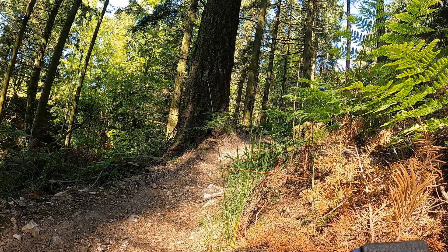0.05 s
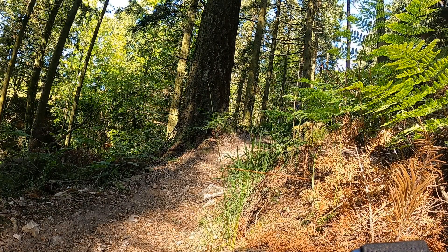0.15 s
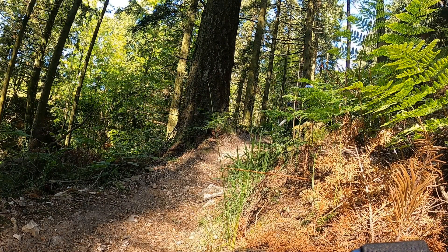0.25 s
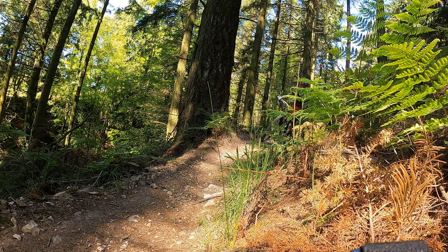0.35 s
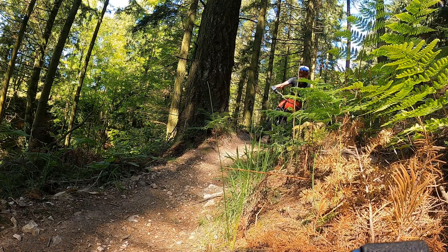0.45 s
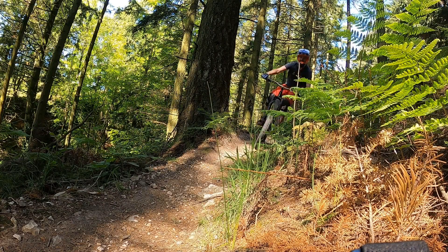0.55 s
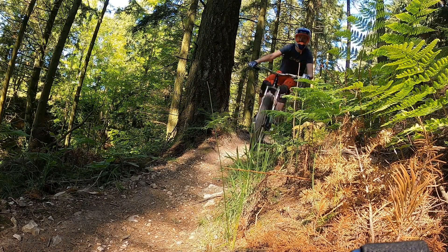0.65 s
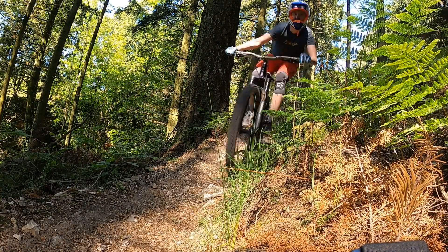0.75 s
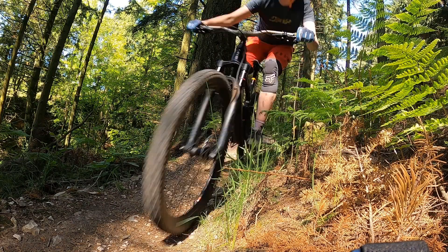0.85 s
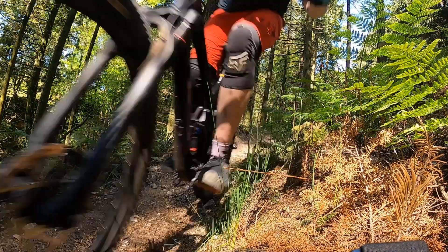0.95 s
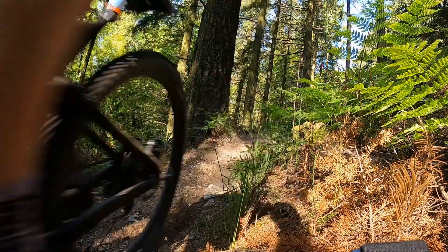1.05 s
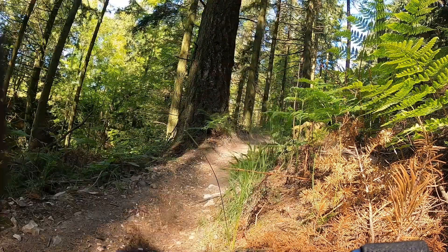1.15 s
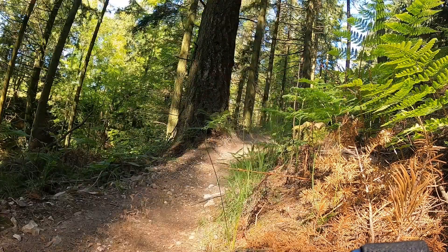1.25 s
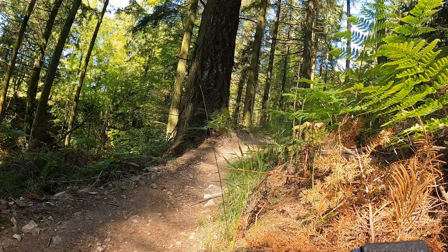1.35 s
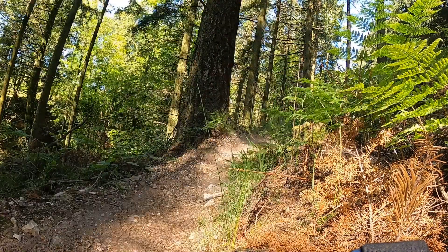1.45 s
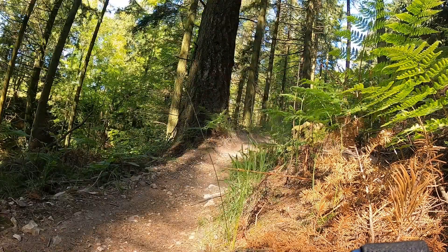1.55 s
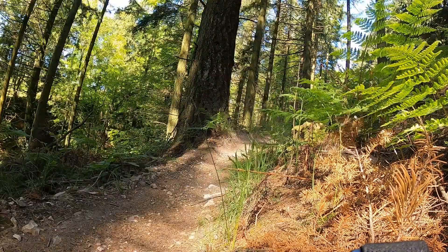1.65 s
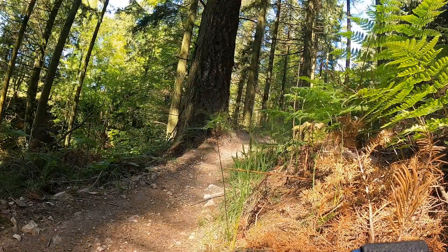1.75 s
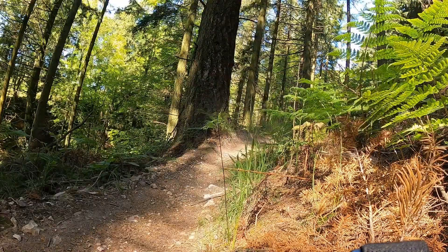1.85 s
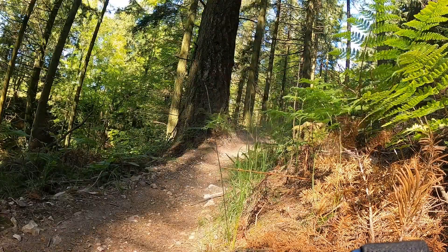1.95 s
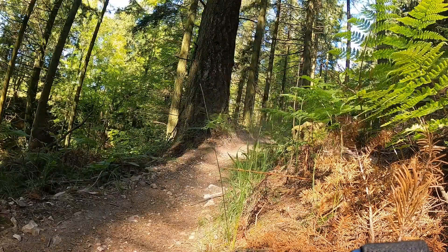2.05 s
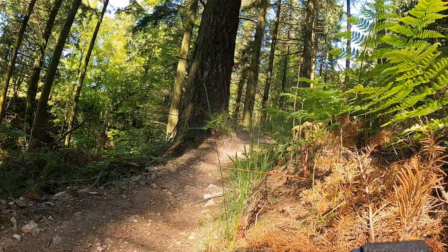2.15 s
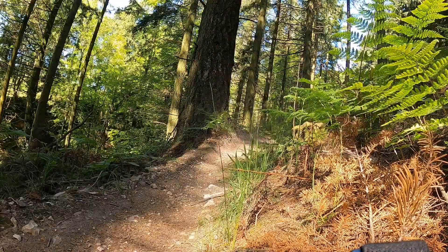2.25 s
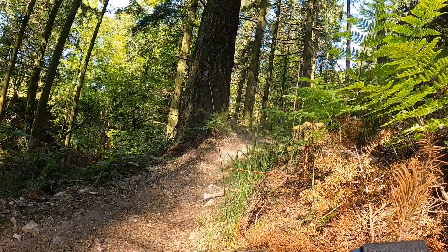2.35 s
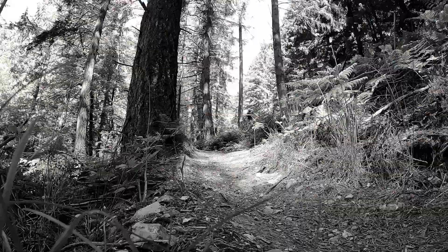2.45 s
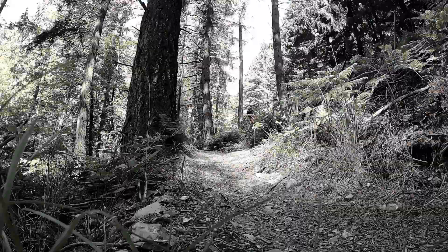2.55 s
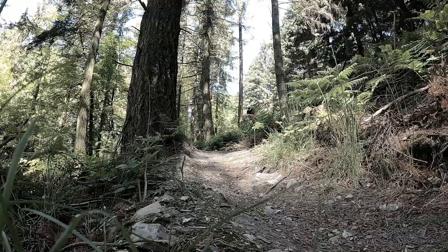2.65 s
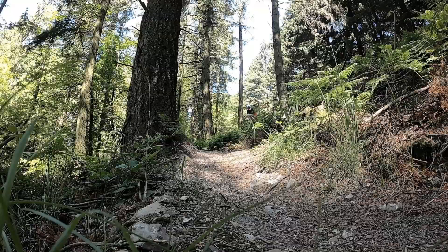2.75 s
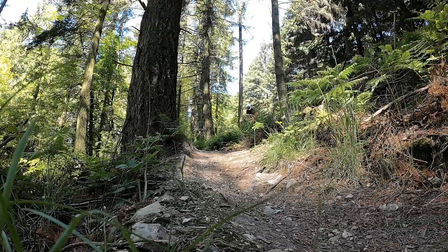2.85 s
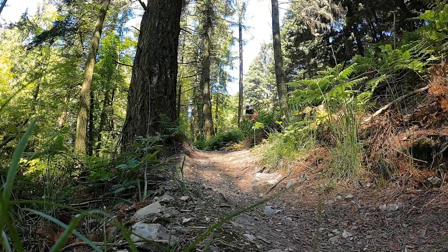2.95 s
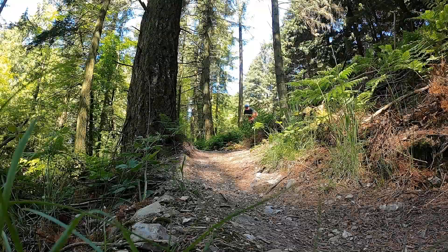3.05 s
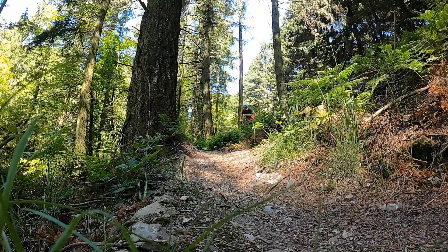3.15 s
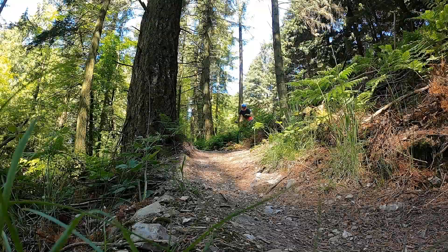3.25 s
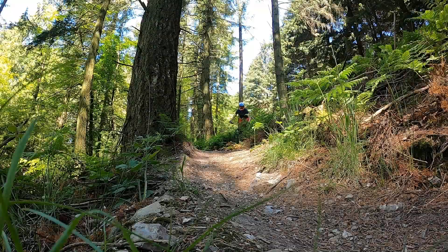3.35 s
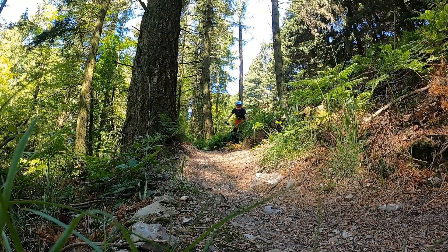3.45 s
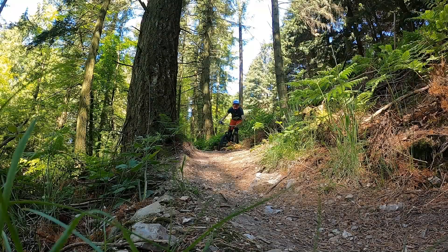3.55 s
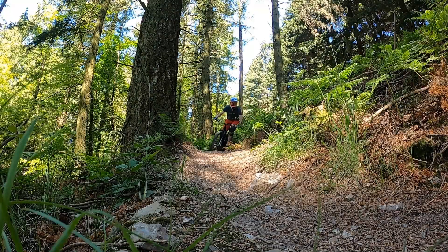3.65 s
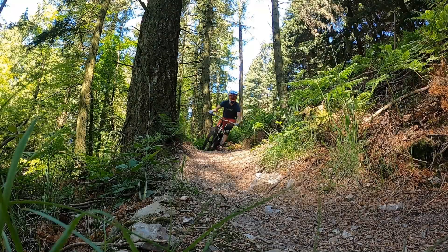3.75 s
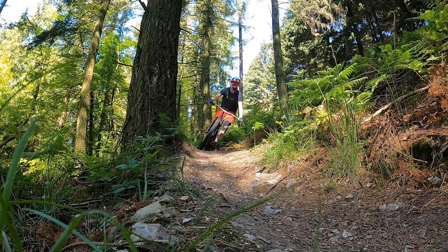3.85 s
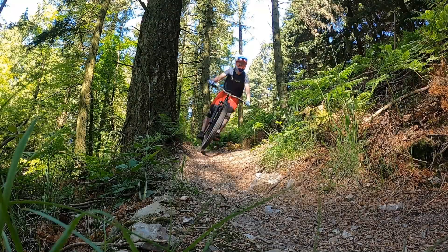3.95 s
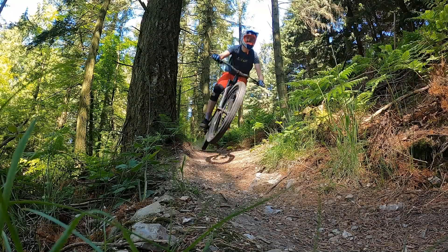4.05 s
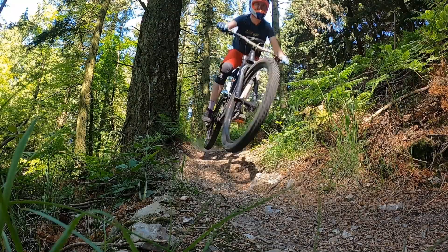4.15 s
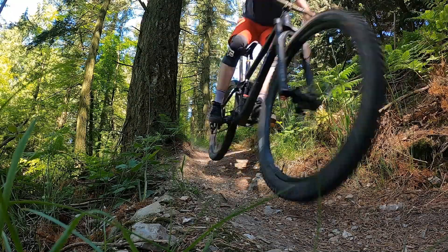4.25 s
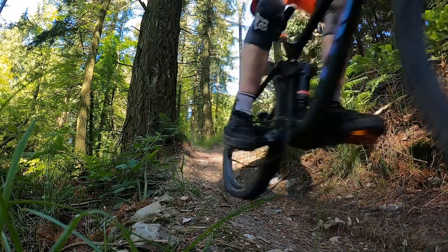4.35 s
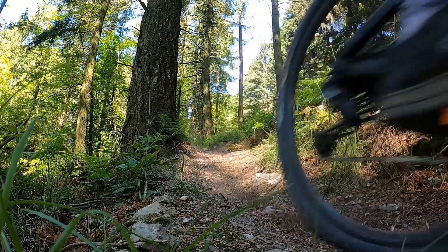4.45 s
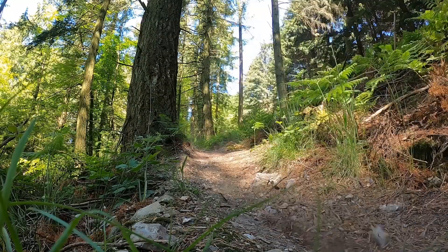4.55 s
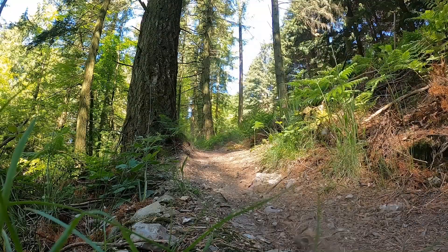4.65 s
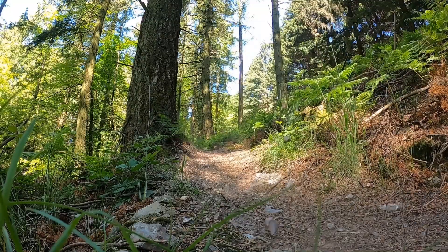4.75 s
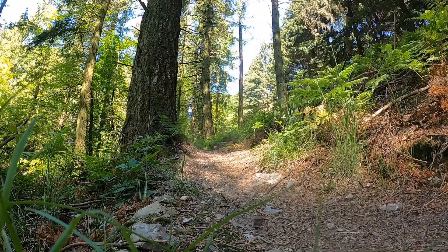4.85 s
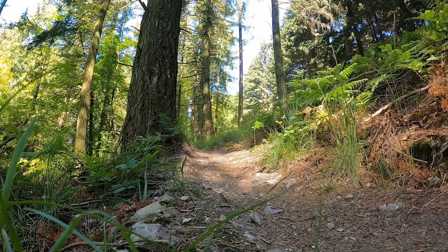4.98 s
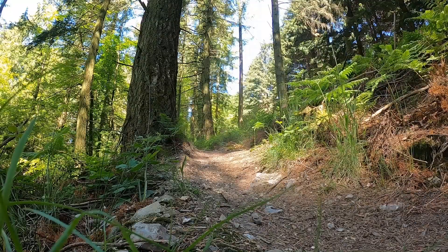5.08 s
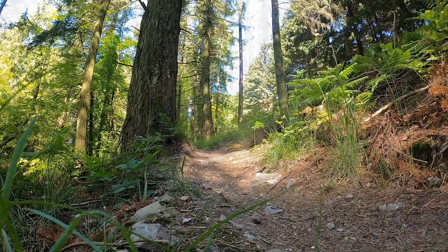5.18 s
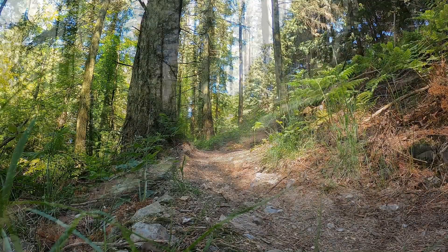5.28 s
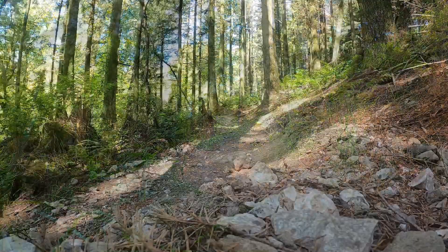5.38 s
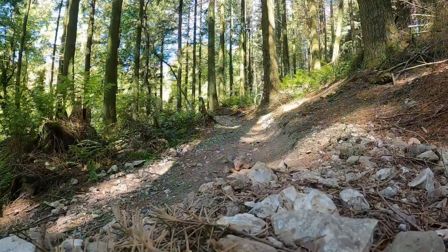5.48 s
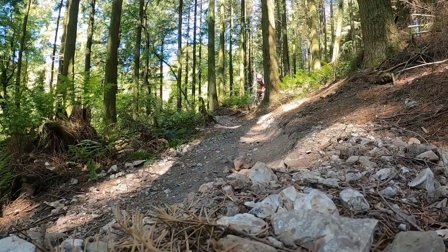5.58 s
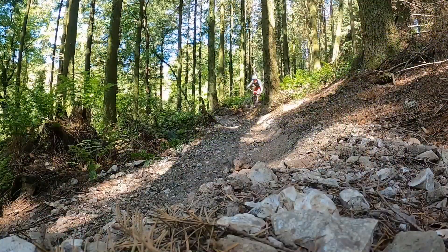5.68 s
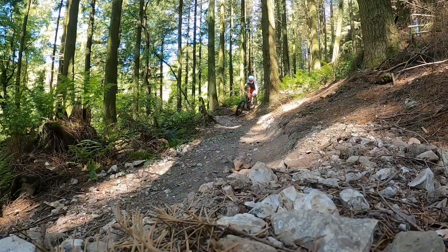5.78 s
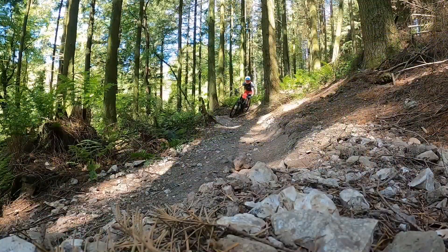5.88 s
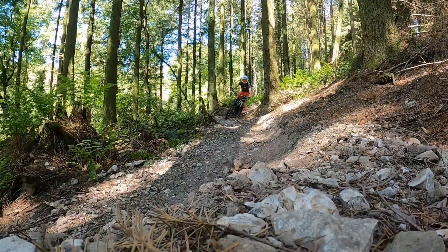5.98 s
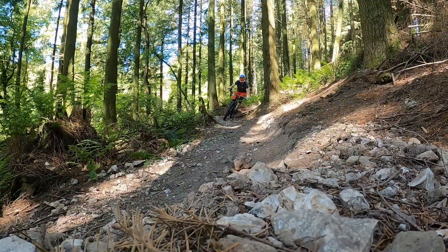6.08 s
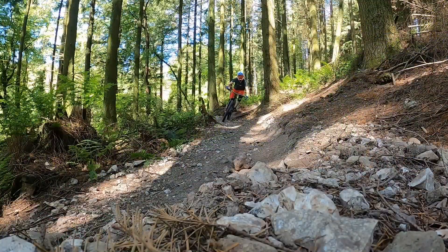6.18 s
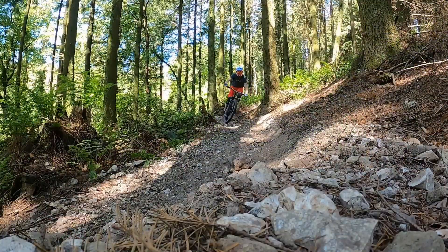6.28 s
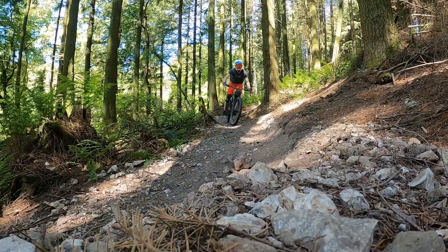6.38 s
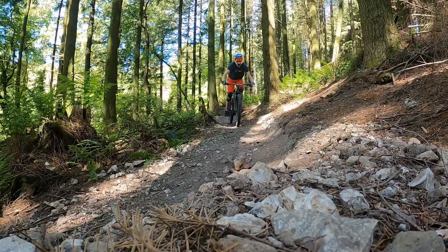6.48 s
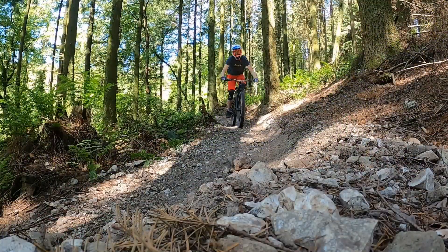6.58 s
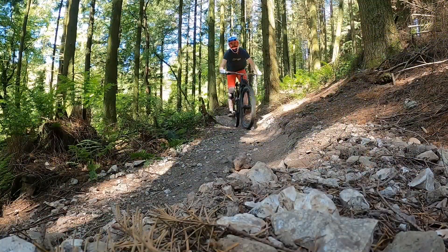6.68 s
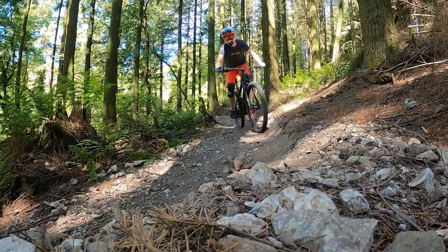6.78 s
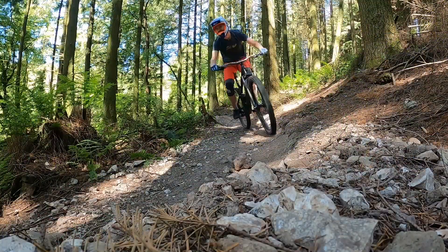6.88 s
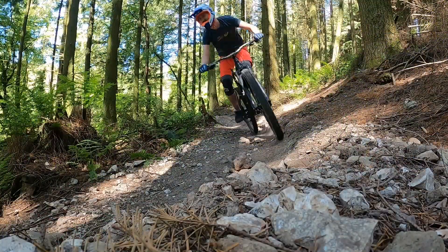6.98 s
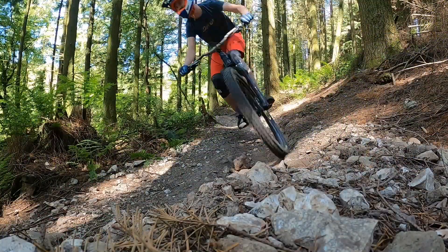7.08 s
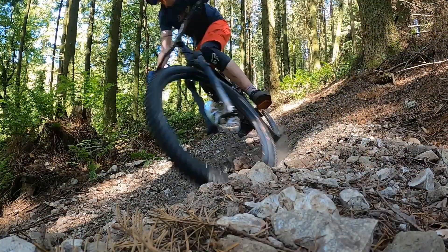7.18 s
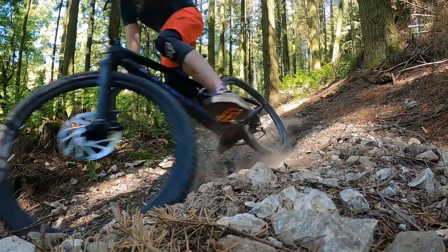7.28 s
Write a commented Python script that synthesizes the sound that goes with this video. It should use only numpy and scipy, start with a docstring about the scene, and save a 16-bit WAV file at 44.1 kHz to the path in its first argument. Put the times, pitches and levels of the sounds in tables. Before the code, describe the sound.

Beside a rocky woodland trail, a small stereo microphone near the ground catches three bicycle passes. Each begins with distant knocks and soft tyre rumble, then swells into crunching gravel, hard stone clacks and hissing dust. The first two leave with thumping gusts and settling grit; the third is cut off at its close, crunchy peak. Short bird whistles sound only at the start.

```python
"""A bird calls in still forest air as a mountain bike nears a small camera beside a dry trail.
The first pass drums, crushes grit and strikes stones; the wheels whir in the air, then wind buffets.
A second pass follows, then a brief dip in level, and a third pass is loudest at the end.
Tyres and wind are shaped, filtered noise; stones are short pulses of tone and noise; the bird is
gliding sines. The loudest blows and gusts saturate the input."""
import sys
import numpy as np
from scipy import signal
from scipy.fft import rfft, irfft
from scipy.io import wavfile
from scipy.ndimage import uniform_filter1d

SR = 44100
rng = np.random.default_rng(int(sys.argv[2]) if len(sys.argv) > 2 else 0)


def inscribe(sig):
    """Save sig as 16-bit PCM at rate SR to the path in sys.argv[1].

    A 1-D sig is mono; a 2-D sig holds one channel per row.
    Samples are clipped to [-1, 1] before scaling.
    """
    pcm = np.round(np.clip(np.atleast_2d(sig).T, -1, 1) * 32767)
    wavfile.write(sys.argv[1], SR, pcm.astype(np.int16))


N = 322812
LAG = 2  # samples by which the left port trails


def amp(db):
    """Decibel law: level to amplitude gain."""
    return 10 ** (np.asarray(db) / 20)


def evened(x):
    """Normalisation to unit rms."""
    return x / np.sqrt(np.mean(x ** 2) + 1e-20)


def power_sum(*db):
    """Incoherent addition: the powers of unrelated sounds add."""
    return 10 * np.log10(sum(amp(d) ** 2 for d in db))


def seconds():
    """Time axis in seconds."""
    return np.arange(N) / SR


def read(points, hz):
    """Linear interpolation on a log-frequency axis."""
    f, value = np.transpose(points)
    return np.interp(np.log(hz + 1), np.log(f + 1), value)


def add(mix, s, sound):
    """Superposition: mixes a two-channel sound in at time s."""
    part = mix[:, round(s * SR):][:, :sound.shape[1]]
    part += sound[:, :part.shape[1]]


def colour(x, spectrum):
    """Minimum-phase filtering: phase follows from the log gain, so nothing rings before a click."""
    gain_db = np.maximum(read(spectrum, np.fft.rfftfreq(8192, 1 / SR)), -100)
    log_gain = np.log(amp(gain_db))
    circle = np.concatenate([log_gain, log_gain[-2:0:-1]])
    response = np.exp(np.conj(signal.hilbert(circle)))
    taps = np.fft.ifft(response).real[:4096]
    return signal.oaconvolve(x, taps[None], axes=1)[:, :N]


ONE_PORT_FROM_S, ONE_PORT_TO_S = 1.7, 2.37


def one_port():
    """One-port span: true while both sides carry chiefly the one port."""
    t = seconds()
    return (t > ONE_PORT_FROM_S) & (t < ONE_PORT_TO_S)


# Likeness of the two ports: pitch_hz, likeness (0-1)
LIKENESS = [(60, 1), (130, 1), (640, 0.92), (1400, 0.83), (3100, 0.91), (6800, 0.098), (15000, .02)]


def ports(apart):
    """Spatial coherence: noise is alike at two ports in the bass, unlike in the treble.
    apart (0-1) is the amplitude share of the left that the right never hears."""
    a, b, c = rfft(rng.standard_normal((3, N)))
    same = np.clip(read(LIKENESS, np.fft.rfftfreq(N, 1 / SR)), 0, 1)
    right = irfft(a, N)
    left = np.roll(irfft(same * a + np.sqrt(1 - same ** 2) * b, N), LAG)
    left = np.sqrt(1 - apart ** 2) * left + apart * irfft(c, N)
    return np.array([np.where(one_port(), 0.78 * right + 0.18 * left, left), right])


def bursts(per_s, spread_db, length_s, bed):
    """Shot noise: contacts of chance size and time, each decaying exponentially, over an even bed."""
    size_db = spread_db * np.minimum(rng.exponential(1, N), 3)
    size = amp(size_db) * (rng.random(N) < per_s / SR)
    r = np.exp(-1 / (max(length_s, 1e-4) * SR))
    return bed + evened(signal.lfilter([1], [1, -r], size))


def steadied(shape):
    """Finite energy supply: a crackle keeps its mean power over about 0.08 s."""
    return shape / np.sqrt(uniform_filter1d(shape ** 2, size=3500))


def layer(shape, spectrum, level_db, apart=0):
    """Source-filter principle: a crackle shapes noise, a body colours it, a level scales it."""
    noise = steadied(shape) * ports(np.clip(apart, 0, 1))
    return amp(level_db) * evened(colour(noise, spectrum))


def patchy(x, depth_db):
    """Changing resonance: stones and clods make small patches of the spectrum swell and sink."""
    z = signal.stft(x, nperseg=512, noverlap=384)[2]
    field = rng.standard_normal(z.shape[:0:-1]).T
    field = uniform_filter1d(field, size=3, axis=0)
    field = evened(uniform_filter1d(field, size=7, axis=1))
    gain = evened(amp(depth_db * field))
    return signal.istft(z * gain, nperseg=512, noverlap=384)[1][:, :N]


# Bike nearing, passing and leaving, in consecutive tables: start_s, drumming level_db,
# crunch level_db, thrown grit or spinning wheel level_db, air and dust hiss level_db
RIDE = [
    [(0.0, -40, -51, -43.5, -69), (0.042, -32.5, -48, -40.5, -66), (0.13, -37.5, -50, -44.5, -59),
     (0.35, -24, -41, -40.5, -56.5), (0.38, -30, -33.5, -37, -47), (0.414, -27.5, -45, -39.5, -48),
     (0.482, -22, -31.5, -38.5, -49), (0.648, -25, -38.5, -37, -54), (0.748, -42, -53, -41, -48),
     (0.806, -32, -34.5, -37, -50), (0.854, -33, -50, -33, -34.5), (0.898, -33.5, -24, -27.5, -45),
     (0.955, -20, -30, -30, -37)],
    [(0.961, -19.5, -17.5, -18.5, -29.5), (1.033, -6.5, -18, -18.5, -33.5), (1.181, -23.5, -13.5, -17, -28),
     (1.217, -10.5, -24, -28.5, -30.5), (1.299, -9.5, -26.5, -30, -32), (1.349, -15, -40.5, -40, -46),
     (1.455, -33, -37, -41.5, -51), (1.513, -20.5, -35, -43.5, -52.5), (1.699, -36.5, -42, -45, -56.5),
     (1.793, -37, -57, -52, -56), (1.813, -28.5, -53, -49.5, -51), (2.023, -28.5, -41, -49, -52.5),
     (2.36, -69, -53.5, -56.5, -52.5)],
    [(2.37, -61, -50, -53, -68), (2.468, -41, -55.5, -57, -61), (2.704, -58, -58, -56.5, -67),
     (2.924, -41.5, -50.5, -48, -63), (2.962, -37, -64, -52, -67), (3.006, -28.5, -44, -44, -51),
     (3.028, -32.5, -51, -44.5, -57), (3.176, -38, -42.5, -48.5, -51.5), (3.522, -36, -38, -50.5, -55.5),
     (3.874, -24.5, -22.5, -51, -47), (3.934, -22, -22, -38, -47), (4.21, -44, -53.5, -40, -43),
     (4.343, -37, -36.5, -32, -38.5)],
    [(4.349, -19.5, -15.5, -6.5, -44), (4.371, -20, -25, -28.5, -38.5), (4.431, -7.5, -18, -12.5, -36),
     (4.539, -17, -15.5, -20.5, -34), (4.801, -28, -37, -42.5, -50.5), (4.913, -32.5, -39.5, -47, -54),
     (4.949, -30.5, -57, -51, -50), (4.955, -34, -57, -53, -49), (4.981, -38, -48, -48, -56),
     (5.037, -37, -39, -48, -56), (5.137, -41, -62, -56, -58), (5.175, -45, -41, -59, -56),
     (5.2, -34, -44, -62.5, -68)],
    [(5.25, -35, -61, -68, -72), (5.318, -33, -66, -65, -75), (5.364, -45, -52, -51, -73),
     (5.47, -42.5, -53.5, -54, -74), (5.572, -32, -53, -53, -72), (5.586, -18.5, -30.5, -43, -62),
     (5.626, -49, -41, -44, -58), (5.702, -24, -40, -39, -57), (5.722, -16.5, -39, -45, -61),
     (5.75, -57, -40, -48, -65), (5.768, -29.5, -44, -44, -53.5), (6.008, -34.5, -41.5, -48, -51),
     (6.06, -30, -36, -51, -56)],
    [(6.066, -30, -55, -58, -57), (6.096, -22, -23, -45, -49.5), (6.368, -37, -36.5, -49, -59.5),
     (6.588, -34, -30.5, -42.5, -48), (6.814, -31.5, -32.5, -39.5, -50.5), (6.822, -36, -14, -21.5, -56),
     (6.834, -28.5, -21.5, -37.5, -48), (7.086, -27, -31.5, -33, -45), (7.12, -40, -7, -25, -47),
     (7.168, -27, -11.5, -40, -56), (7.186, -15, -27.5, -40, -60), (7.21, -18, -10.5, -23.5, -50),
     (7.3, -17, -12.5, -21.5, -49)],
]


def ride_db(column):
    """Level envelope: interpolates a table, which holds its last value until the next begins."""
    held = [np.vstack([a, [b[0][0] - 1 / 1000, *a[-1][1:]]]) for a, b in zip(RIDE, RIDE[1:])]
    rows = np.concatenate(held + RIDE[-1:])
    return np.interp(seconds(), np.maximum.accumulate(rows[:, 0]), rows[:, column])


# Stretches of trail: start_s, soil over its rule (dB), chips over their rule (dB),
# still-air draught level_db, wake over the drumming (dB), tight eddies over the draught (dB),
# grip on the gravel (dB), fine dirt over the gravel (dB), bass unlike between ports (share 0-1)
TRAIL = [(0, 4, 7, -56, -19, -12, 11.5, -16, 0), (.96, -1.5, 3.5, -50, -9, -3.5, 11, -12, 0.04),
         (1.21, 5, -4, -50, -8, -5, 0.5, -22, 1), (1.39, 2, 2, -50, -11, -7.5, -0.5, -22, 0.45),
         (1.7, 4, 2.5, -48, -5, -12, 8, -9, 1), (2.365, 3, 5, -62, -11, -24, 14.5, -8.5, 0.3),
         (4.345, 1.5, 2.5, -62, -7, -6, 13.5, -4, 0), (4.56, -1.5, 1, -50, -12, -5, 11, -9, 0.35),
         (5.235, 3.5, 8.5, -43, -13, -5.5, 11, -26, 0.24), (6.06, -0.5, 0.5, -50, -6, -4, 11, -24, 0.18),
         (7.1, -5.5, -10, -52, -7, 7.5, 11, -11, 0.16)]


def trail(column):
    """Piecewise-constant ground: a property of the stretch under the wheels."""
    rows = np.array(TRAIL)
    return rows[np.searchsorted(rows[1:, 0], seconds()), column]


# Where the wheel is: start_s, left over right (dB)
WHEEL_SIDE = [(0, 0), (.96, -1), (1.18, 3.5), (1.28, 15), (1.45, 8.5), (1.75, 0.5), (2.4, 2), (4.56, -1.5),
              (4.67, 4), (5.2, 8), (5.26, -1)]


def wheel_side_db(s):
    """Interaural level difference: the side of the wheel at time s."""
    return np.interp(s, *np.transpose(WHEEL_SIDE))


# Forest air spectrum: pitch_hz, relative density (dB per Hz)
AIR_SPECTRUM = [(24, -59), (40, 2.5), (103, -17), (211, 0), (313, -7.5), (454, -9.5), (728, -21),
                (2780, -27.5), (7870, -32.5), (12600, -56), (15000, -48)]


def forest_air():
    """Stationary noise: still forest air, heard less while both sides carry the one port."""
    return layer(np.ones(N), AIR_SPECTRUM, -43 - 7 * one_port())


# Bird notes: start_s, length_s, start pitch_hz, middle pitch_hz, end pitch_hz, level_db (rms)
NOTES = [(.03, .08, 2480, 2700, 2520, -47), (.165, .115, 3250, 2930, 2860, -48),
         (.18, .14, 7700, 7700, 7620, -64)]


def birds():
    """Frequency modulation: near-sine notes glide, their level ruffled by leaves on the way."""
    out = np.zeros((2, N))
    for s, length_s, *hz, db in NOTES:
        t = np.arange(0, length_s, 1 / SR)
        flutter = uniform_filter1d(rng.standard_normal((8000, 2)), size=150, axis=0)
        ruffle = 1 + .55 * evened(flutter).T[:, :len(t)]
        glide_hz = np.interp(t, [0, length_s / 2, length_s], hz)
        tone = np.sin(2 * np.pi * np.cumsum(glide_hz) / SR) * amp(db)
        add(out, s, np.sqrt(2) * tone * signal.windows.tukey(len(t), .4) * ruffle)
    return out


# Gusts on the ports: peak_s, level_db, half_length_s
GUST_TIMES = [(.32, -46, .04), (0.397, -35, .04), (0.604, -31.5, 0.095), (.8, -40, 0.03),
              (0.972, -15, 0.012), (1.078, -10, 0.1), (1.215, -9, 0.071), (1.323, -9, 0.048),
              (1.456, -22, .08), (1.602, -22, 0.11), (1.815, -11.5, 0.035), (1.874, -8.5, 0.047),
              (2.016, -13.5, 0.063), (2.092, -14, 0.02), (2.193, -20.5, 0.057), (2.3, -27, 0.061),
              (2.5, -41, 0.023), (2.777, -38, 0.017), (2.823, -30, 0.027), (2.916, -32, 0.037),
              (3.03, -41, 0.086), (3.174, -34.5, 0.021), (3.32, -34.5, .05), (3.453, -31, 0.017),
              (3.82, -33, 0.022), (3.914, -22, 0.026), (4.413, -8, 0.042), (4.49, -12, 0.034),
              (4.57, -6, 0.05), (4.848, -32, 0.071), (5.177, -34, .02), (5.364, -47, 0.023),
              (5.757, -27.5, 0.094), (5.874, -25, 0.024), (6.176, -29, 0.12), (6.34, -37, .06),
              (6.502, -34, 0.1), (6.74, -31, 0.056), (6.885, -26, 0.035), (7.02, -32, 0.026),
              (7.147, -14.5, 0.019)]
GUST_FALL_DB = 8  # drop at one half length from the peak
# Broad wind and tight eddy spectra: pitch_hz, relative density (dB per Hz)
WIND_SPECTRUM = [(15, -57), (30, 6.5), (45, 8), (70, 6), (140, -2.5), (260, -16.5), (340, -27), (750, -26),
                 (1300, -41), (4000, -84)]
EDDY_SPECTRUM = [(50, -43), (95, -10.5), (140, 5.5), (180, -3), (260, -21), (600, -64.5)]


def draught():
    """Turbulent pressure: eddies shove the ports in lumps of a few hundredths of a second."""
    t = np.arange(0, N + 64, 64) / SR
    gusts = (np.maximum(db - GUST_FALL_DB * ((t - s) / half_s) ** 2, -120) for s, db, half_s in GUST_TIMES)
    gust_db = np.interp(seconds(), t, power_sum(*gusts))
    wake_db = ride_db(column=1) + trail(column=4)
    level_db = power_sum(gust_db, trail(column=3), wake_db)
    apart = trail(column=8)
    lumps = bursts(30, 3.0, .02, bed=1.1)
    wind = layer(lumps, WIND_SPECTRUM, level_db, apart=apart + 0.1)
    eddies = layer(lumps, EDDY_SPECTRUM, level_db + trail(column=5), apart=apart)
    return wind + eddies


def blow(t, rise_s):
    """Contact force: builds in rise_s to a top of 1, then lets go."""
    return t / rise_s * np.exp(1 - t / rise_s)


# Stones and twigs struck, levels before each part's make-up gain: start_s, stone level_db,
# stone pitch_hz, snap level_db, tyre thump level_db, bright tick level_db
BLOWS = [(0.034, -34, 700, -42, -18, -51), (0.401, -19.5, 570, -40, -42, -29),
         (0.518, -14, 600, -34, -13.5, -47), (0.567, -24, 920, -26, -25, -54),
         (0.604, -31, 581, -44, -31, -52), (0.809, -23, 586, -45, -24, -44),
         (0.885, -12.5, 660, -22, -42, -22), (0.933, -22, 552, -23, -17, -36),
         (0.964, -7, 1070, -17.5, -11, -12), (1.013, -10, 725, -20, -7, -33),
         (1.037, -0.5, 860, -10, -4, -11), (1.047, -15, 1710, -9, -10, -9), (1.099, 0, 1040, -9.5, -4, -21),
         (1.174, -7, 1030, -32, -15, -11.5), (1.188, -5, 1450, -23, -13, -21),
         (1.244, -16, 564, -21, -14, -18), (1.377, -30, 565, -40, -41, -28),
         (1.445, -22.5, 552, -48, -43, -34), (1.502, -17, 760, -38, -38, -50),
         (1.713, -25.5, 640, -52, -37, -58), (2.814, -34.5, 645, -51, -44, -56),
         (2.994, -32, 546, -52, -49, -51), (3.047, -37, 568, -43, -36, -51),
         (3.252, -22, 530, -40, -41, -38), (3.713, -17.5, 552, -57, -29, -38),
         (3.936, -20, 573, -34, -6, -39), (3.978, -18, 680, -26, -17, -32),
         (4.096, -42, 1340, -37, -49, -33), (4.352, 2, 1560, -18, -13, -37), (4.392, -2, 961, -15, -8, -36),
         (4.41, 0.5, 1170, -11, -9, -16), (4.441, -8, 920, -18, -1, -21), (4.521, 1, 1070, -16, -3, -33),
         (4.552, -2, 1180, -33, -29, -33), (4.679, -33, 836, -27, -22, -37),
         (4.783, -32, 689, -44, -46, -51), (4.894, -41, 724, -44, -38, -48.5),
         (4.956, -23, 1480, -31.5, -38, -35), (4.994, -40, 579, -44, -44, -48),
         (5.153, -34, 1000, -52, -46, -53.5), (5.351, -34, 760, -48, -46, -59),
         (5.586, -21, 610, -37, -21, -55), (5.694, -14, 515, -44, -38, -52),
         (5.706, -20, 513, -51, -36, -52), (5.822, -24, 570, -52, -45, -44),
         (5.916, -19.5, 530, -48, -41, -43), (5.998, -23, 665, -55, -57, -60),
         (6.065, -23, 613, -48, -39, -55), (6.078, -9, 610, -48, -44, -63),
         (6.137, -12, 1040, -44, -25, -39), (6.403, -18.5, 720, -37, -37, -57),
         (6.616, -14.5, 613, -31, -39, -49), (6.664, -17.5, 590, -34, -35, -47),
         (6.699, -12, 1080, -27, -41, -48), (6.725, -16, 603, -29, -18, -49),
         (6.795, -17, 727, -33, -36, -44), (6.821, -9, 950, -43, -23, -37),
         (6.853, -18, 600, -31, -23, -48), (6.914, -9.5, 580, -31, -20, -46),
         (7.022, -15.5, 556, -37, -17, -46), (7.048, -13.5, 630, -32, -23, -42),
         (7.108, -6, 695, -23, -18, -33), (7.122, -9, 754, -20, -16, -32), (7.14, -2, 888, -31, -23, -31),
         (7.204, -3, 680, -31, -19, -42), (7.245, -3, 846, -22, -8, -25), (7.262, -6, 690, -17, -7.5, -30)]


def stones():
    """Impact: a short pulse of the stone, a snap, a thump in the carcass, a tick of noise."""
    out, t = np.zeros((2, N)), np.arange(2400) / SR
    ticks = rng.standard_normal((len(BLOWS), 2, len(t)))
    bright = signal.butter(3, [3300, 9000], "band", fs=SR, output="sos")
    for (s, db, hz, snap_db, thump_db, tick_db), noise in zip(BLOWS, ticks):
        stone = np.sin(2 * np.pi * hz * t) * amp(db + 2.5) * blow(t, .6 / hz)
        snap = np.sin(2 * np.pi * 2150 * t) + .2 * np.sin(2 * np.pi * 4100 * t)
        snap = snap * amp(snap_db + 9) * blow(t, .0006)
        fall_db = 60 * t / 0.034
        thump = np.sin(2 * np.pi * 215 * t) * amp(thump_db + 7.5 - fall_db) * np.minimum(t / 0.00084, 1)
        tick = signal.sosfilt(bright, noise) * amp(tick_db + 2) * blow(t, 0.00072)
        side_db = wheel_side_db(s)
        add(out, s, (stone + snap + thump + tick) * amp([[side_db / 2], [-side_db / 2]]))
    out[0] = np.roll(out[0], LAG)
    return out


SPILL_DB, SPILL_S = -14, 0.015  # level relative to the stone column, amplitude decay time


def spill_db():
    """Exponential decay: level of the gravel that each blow sets crunching."""
    kicks = np.zeros(N)
    s, db = np.transpose(BLOWS)[:2]
    kicks[np.round(s * SR).astype(int)] = amp(db + SPILL_DB) ** 2
    power = signal.lfilter([1], [1, -np.exp(-2 / (SPILL_S * SR))], kicks)
    return 10 * np.log10(power + 1e-20)


# Dust hiss, one-port hiss and top-octave spectra: pitch_hz, relative density (dB per Hz)
HISS_SPECTRUM = [(2000, -35), (3800, -10), (4400, -9.5), (5500, -8.5), (6200, -6.5), (7000, -10),
                 (8300, -12), (9500, -18.5), (12500, -22.5), (15500, -74)]
PORT_SPECTRUM = [(3000, -14), (3700, -5), (4400, -24), (5100, -3), (6100, 0), (7000, -10), (8300, -6),
                 (10000, -14), (13000, -30)]
FIZZ_SPECTRUM = [(5000, -32), (8000, 10), (9500, -16), (12500, -35), (14000, -3), (15500, -17)]


def dust(cracks, contact, hiss_db):
    """Many small impacts: dust and needles pelt the ferns."""
    spray = 1.8 + contact * evened(0.91 * cracks + bursts(250, 3.8, .0015, bed=.3))
    # while both sides carry the one port, the hiss takes its own colour
    one = np.clip(uniform_filter1d(1. * one_port(), size=9000), 0, 1)
    hiss = np.sqrt(1 - one) * layer(spray, HISS_SPECTRUM, hiss_db)
    hiss = hiss + np.sqrt(one) * layer(np.ones(N), PORT_SPECTRUM, hiss_db)
    fizz_db = hiss_db - 5 + 0.45 * (hiss_db + 24)  # the top octave fades faster with distance
    return hiss + layer(spray, FIZZ_SPECTRUM, fizz_db)


# Airborne wheel spectrum: pitch_hz, relative density (dB per Hz)
WHIR_SPECTRUM = [(800, -35), (1300, -13), (1600, -16), (2100, 0), (2400, -3), (2800, -8), (3400, -14),
                 (3900, -11), (4400, -20), (9000, -50)]


def whir(contact, grit_db):
    """Aerodynamic noise: wheels off the gravel only whir."""
    return np.sqrt(1 - contact) * layer(np.ones(N), WHIR_SPECTRUM, grit_db)


# Thrown grit and single chip spectra: pitch_hz, relative density (dB per Hz)
GRIT_SPECTRUM = [(600, -67.5), (1500, -2), (1900, -2.5), (2400, -4.5), (2900, -7.5), (3300, -12.5),
                 (4200, -26), (9000, -58.5)]
CHIP_SPECTRUM = [(1800, -34), (3000, -22), (3600, 8), (4300, 0), (5200, 4), (7000, -16), (12000, -47)]


def thrown_grit(cracks, contact, grit_db, chip_db):
    """Granular impact: grit sprays in clusters while chips fly off singly."""
    clusters = 0.27 + evened(cracks * bursts(200, 14.0, 0.0057, bed=11.0))
    grit = np.sqrt(contact) * layer(clusters, GRIT_SPECTRUM, grit_db)
    sharp = cracks * bursts(140, 9.5, 0.0042, bed=1.0)
    return grit + contact * layer(sharp, CHIP_SPECTRUM, chip_db)


# Soil, gravel and fine dirt spectra: pitch_hz, relative density (dB per Hz)
SOIL_SPECTRUM = [(150, -32.5), (330, -4.5), (430, 0.5), (560, -3.5), (700, -18), (1000, -18), (3000, -65)]
GRAVEL_SPECTRUM = [(250, -39.5), (620, 18), (750, 14), (900, 13.5), (1100, 13.5), (1400, 10.5), (1800, -11),
                   (3000, -9.5), (8000, -53)]
DIRT_SPECTRUM = [(900, -38.5), (1400, 0), (1700, 0), (2000, 1.5), (2300, -7.5), (3500, -42)]
SOIL_FROM_DRUM, SOIL_DB = 0.34, -1  # share of drumming in the soil level (rest crunch), offset in dB


def crunch(knocks, cracks, drum_db, gravel_db, wide):
    """Granular friction: soil, gravel and fine dirt give way under the knobs."""
    soil_db = SOIL_FROM_DRUM * drum_db + (1 - SOIL_FROM_DRUM) * gravel_db + SOIL_DB + trail(column=1)
    soil = layer(0.18 * knocks + evened(cracks), SOIL_SPECTRUM, soil_db, 0.91 * wide)
    gravel = layer(cracks, GRAVEL_SPECTRUM, gravel_db, 0.26 * wide)
    dirt = layer(.5 + evened(cracks), DIRT_SPECTRUM, gravel_db + trail(column=7))
    return soil + gravel + dirt


# Ringing carcass and broad slam spectra: pitch_hz, relative density (dB per Hz)
CARCASS_SPECTRUM = [(60, -23), (150, -6), (195, -3.5), (215, 4.5), (235, -3), (300, -9.5), (400, -16),
                    (700, -43), (2000, -72)]
SLAM_SPECTRUM = [(70, -22), (130, 9), (170, -5), (230, 6), (300, 3), (400, -3.5), (800, -53), (2000, -57)]


def drumming(knocks, drum_db, wide):
    """Forced resonance: knocks shake the air-filled carcass; hard blows damp it to a broad slam."""
    hard = np.clip((drum_db + 21.5) / 10, 0, .8)
    ring = layer(1.5 + evened(knocks), CARCASS_SPECTRUM, drum_db, wide)
    slam = layer(knocks, SLAM_SPECTRUM, drum_db, wide)
    return np.sqrt(1 - hard) * ring + np.sqrt(hard) * slam


SPILL_GRIT_DB = -9.5  # grit relative to the gravel crunching after a blow


def tyres():
    """Common excitation: clumps of stones under the knobs drive drumming, crunch and thrown grit."""
    drum_db, roll_db, thrown_db, hiss_db = (ride_db(column=k) for k in range(1, 5))
    gravel_db = power_sum(roll_db, spill_db())
    grit_db = power_sum(thrown_db, spill_db() + SPILL_GRIT_DB)
    near = np.clip((drum_db + 24) / 16, 0, .65)  # how close the wheel is
    wide = trail(column=8) * np.clip((drum_db + 23) / 16, .3, 1)
    contact = np.clip((gravel_db - grit_db + trail(column=6)) / 8, 0, 1)  # 0 is airborne
    chip_db = (grit_db + hiss_db) / 2 - 11 + 8 * near + trail(column=2)

    clumps = bursts(90, 2.5, .006, bed=2.2)
    cracks = clumps * bursts(550, 5.2, 0.0016, bed=1.0)
    knocks = clumps * bursts(150, 0.44, 0.0031, bed=1.0)

    treble = thrown_grit(cracks, contact, grit_db, chip_db) + whir(contact, grit_db)
    treble = treble + dust(cracks, contact, hiss_db)
    side_db = wheel_side_db(seconds())
    treble = treble * amp([side_db / 2, -side_db / 2])
    ground = crunch(knocks, cracks, drum_db, gravel_db, wide)
    return drumming(knocks, drum_db, wide) + patchy(ground + treble, 1.96)


def scene():
    """Superposition: forest air, bird, draught, stones and tyres."""
    return forest_air() + birds() + draught() + stones() + tyres()


DIP_FROM_S, DIP_TO_S = 5.225, 5.242
EDGE_HZ = 15680


def record(dry):
    """Saturation and band limit: the level dips briefly, peaks flatten, the top is cut off."""
    t = seconds()
    live = dry * np.where((t > DIP_FROM_S) & (t < DIP_TO_S), .06, 1)
    held = live / (1 + abs(live / .99) ** 9) ** (1 / 9)
    low_pass = signal.firwin(511, EDGE_HZ, window=("kaiser", 9), fs=SR)
    return signal.oaconvolve(held, low_pass[None], "same")


dry = scene()
out = record(dry)
inscribe(out)
```